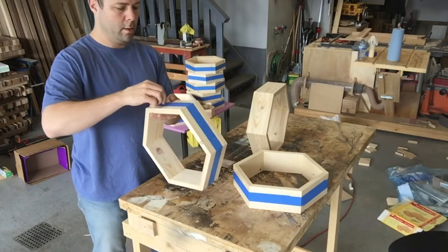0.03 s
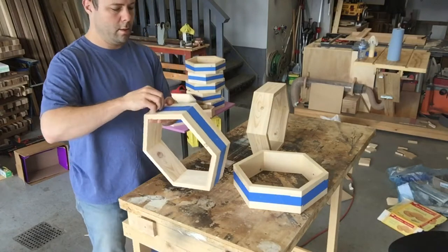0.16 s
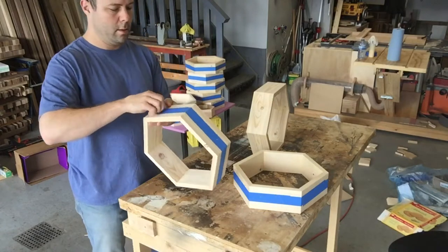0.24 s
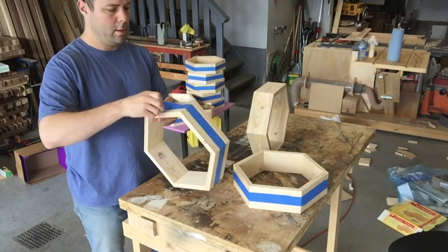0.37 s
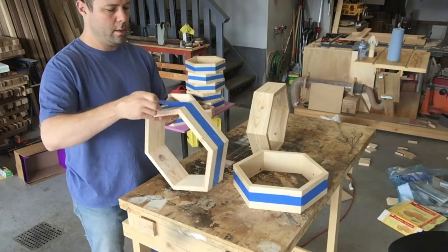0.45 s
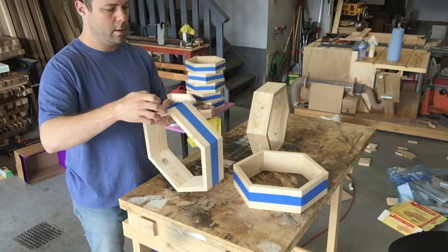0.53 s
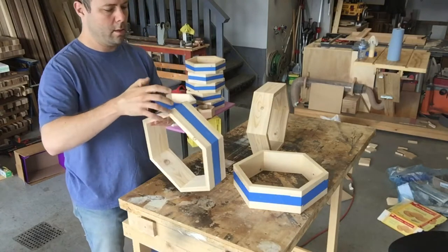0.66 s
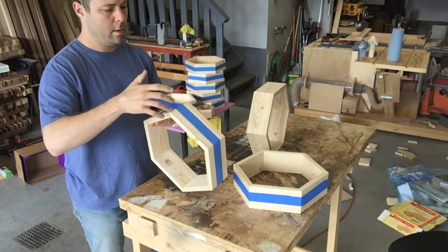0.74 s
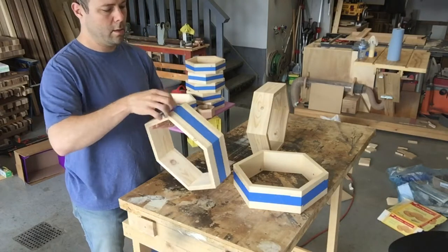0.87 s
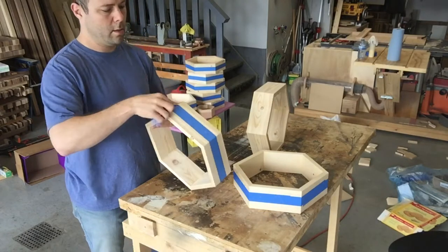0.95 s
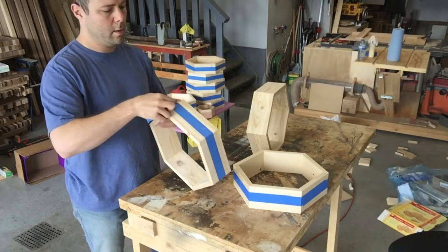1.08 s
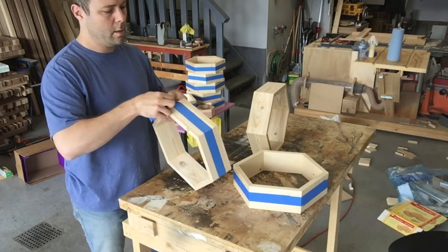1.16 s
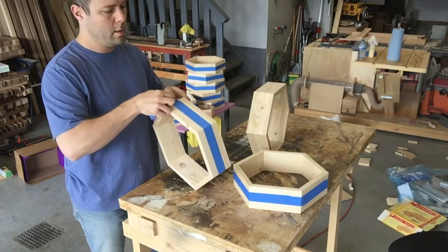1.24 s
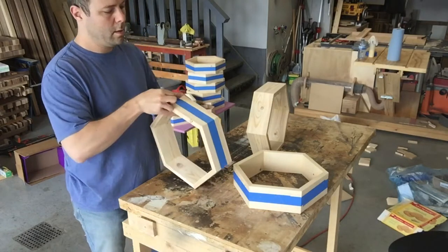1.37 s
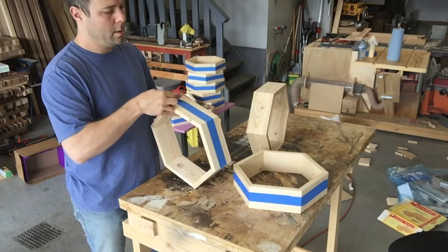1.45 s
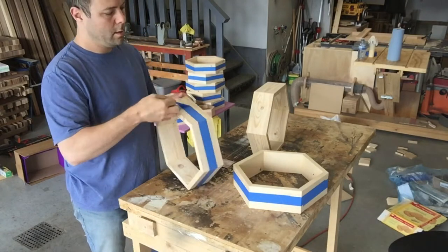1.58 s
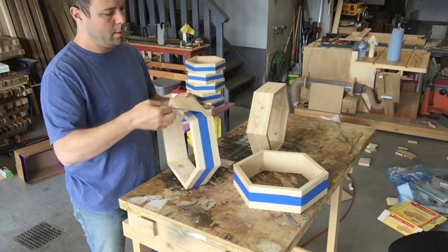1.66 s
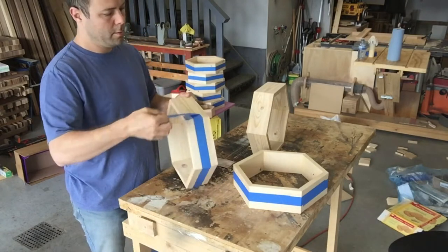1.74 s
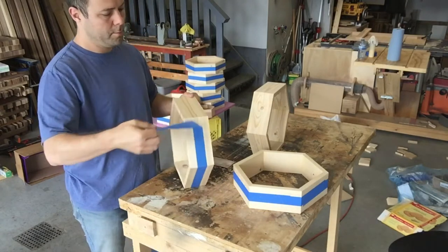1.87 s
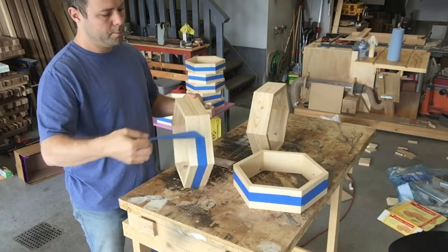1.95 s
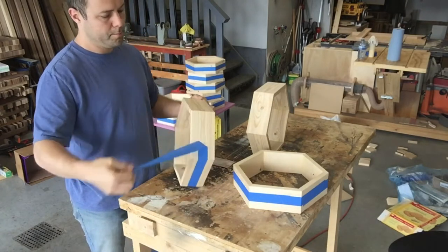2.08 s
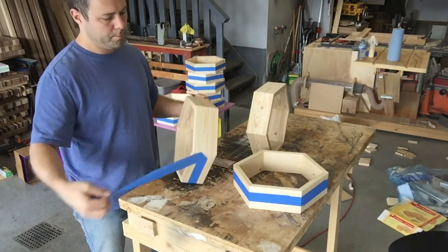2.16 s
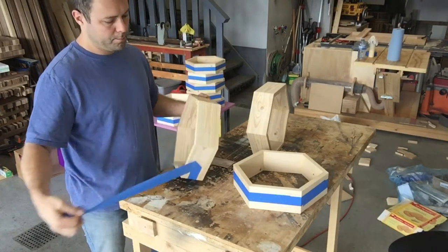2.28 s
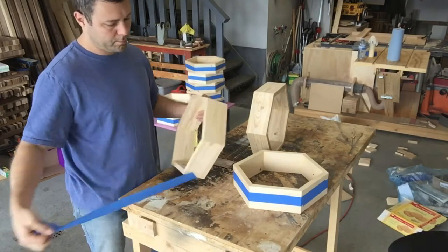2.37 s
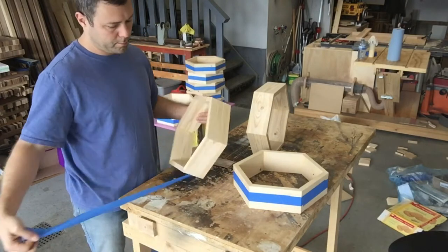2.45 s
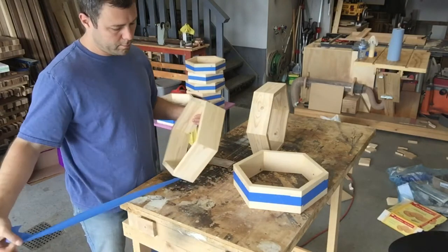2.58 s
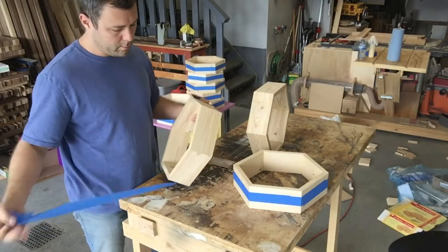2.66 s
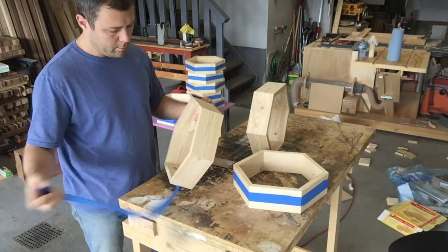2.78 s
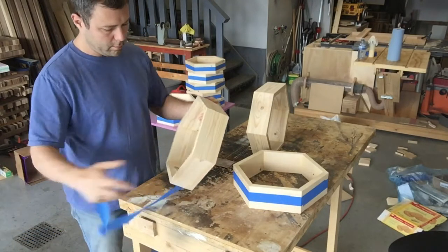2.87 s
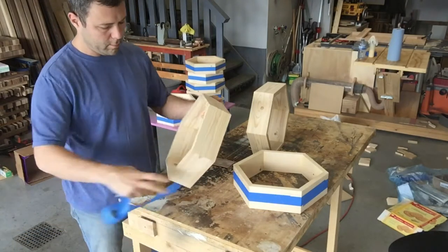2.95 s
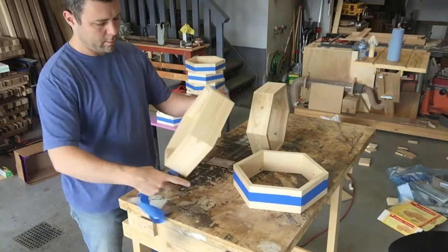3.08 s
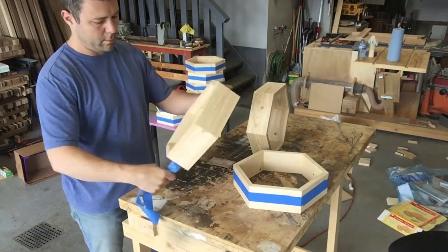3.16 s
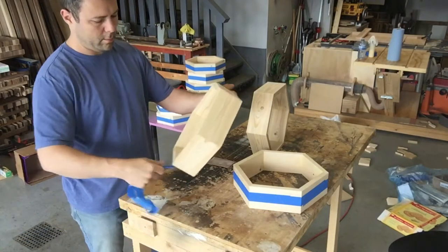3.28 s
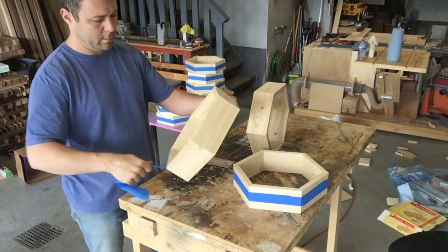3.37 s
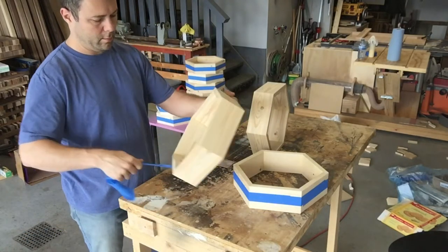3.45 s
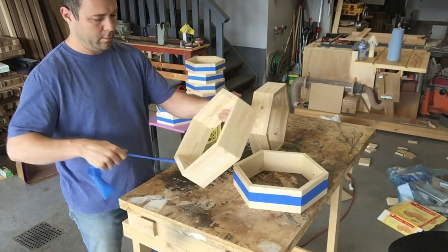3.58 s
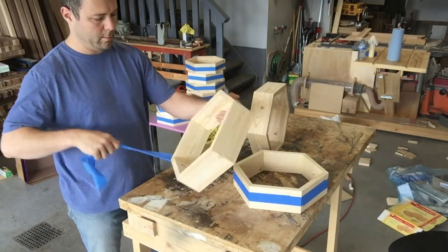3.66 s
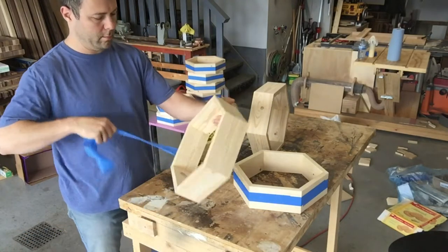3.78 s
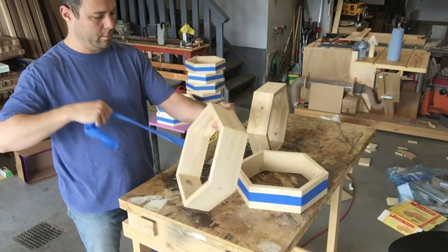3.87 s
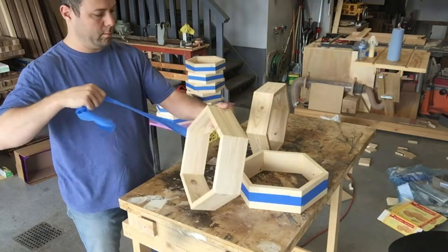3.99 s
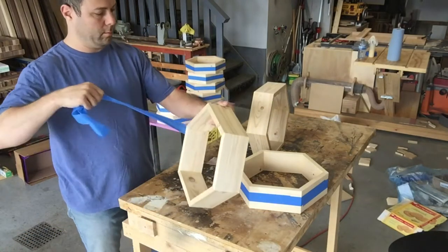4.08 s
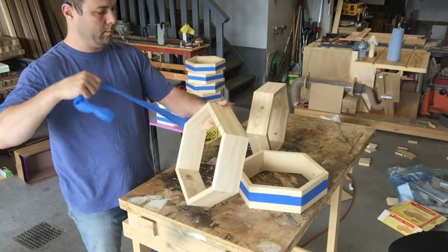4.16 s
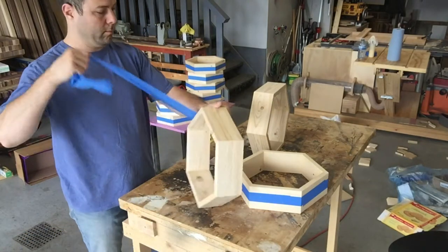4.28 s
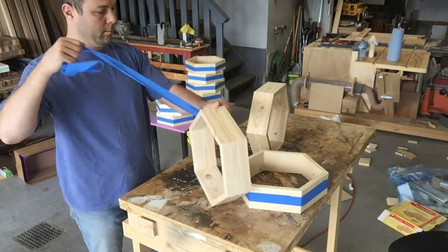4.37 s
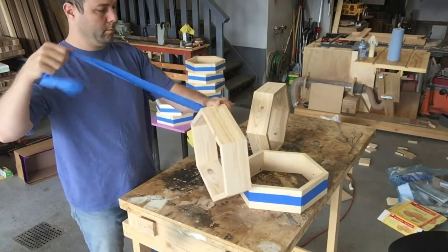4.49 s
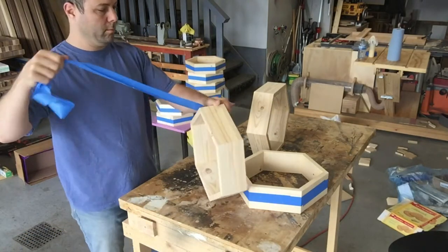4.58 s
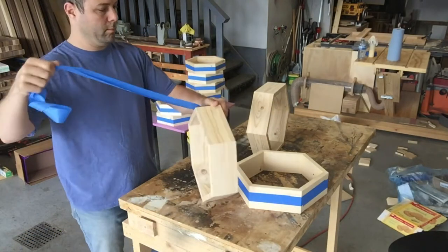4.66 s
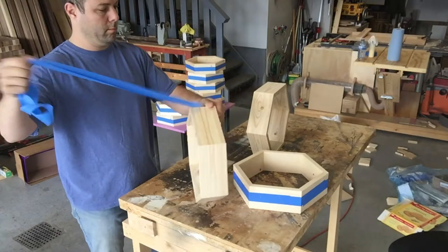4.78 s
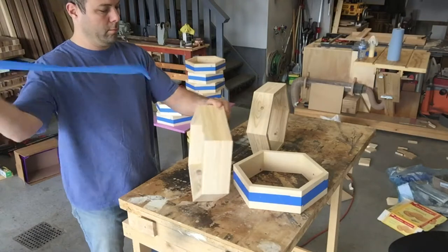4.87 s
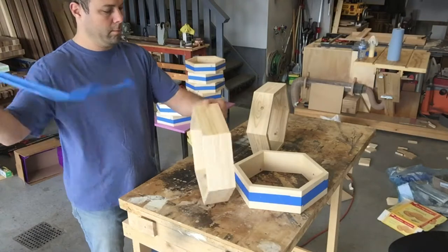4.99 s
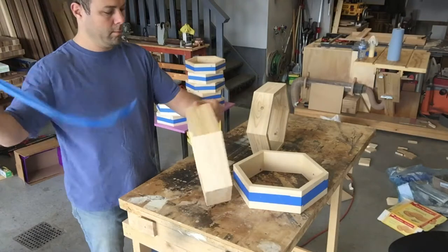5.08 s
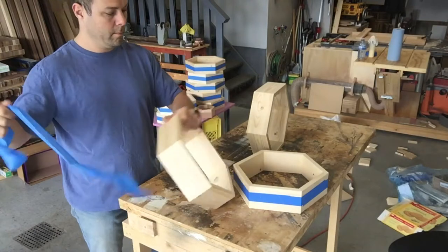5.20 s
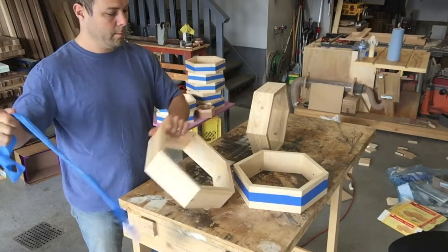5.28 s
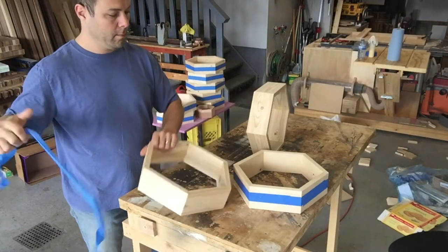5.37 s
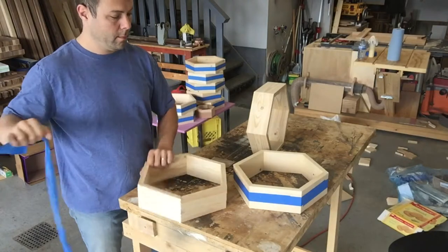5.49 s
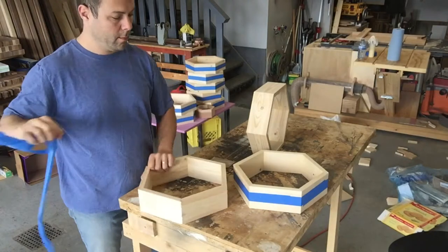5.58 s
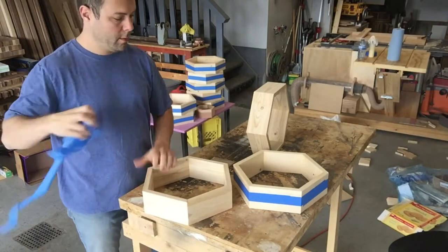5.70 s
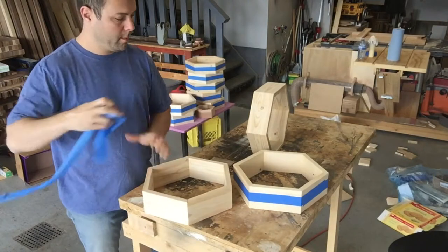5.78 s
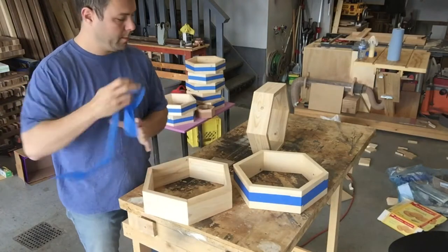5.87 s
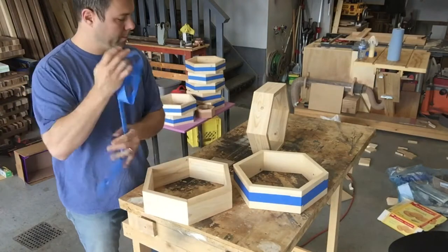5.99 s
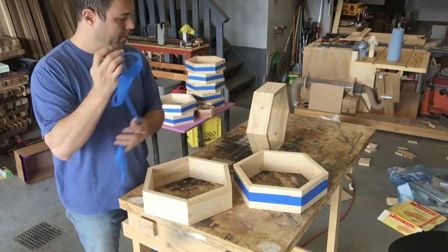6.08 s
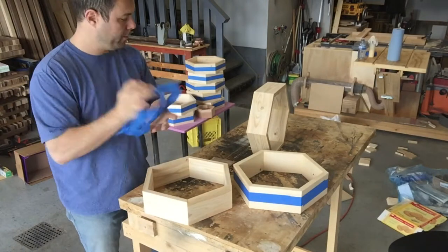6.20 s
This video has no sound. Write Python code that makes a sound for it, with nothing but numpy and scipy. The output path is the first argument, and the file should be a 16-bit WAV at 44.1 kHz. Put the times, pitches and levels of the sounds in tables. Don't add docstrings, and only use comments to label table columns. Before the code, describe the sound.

Paper tape rips from wood in uneven sticky rasps with crisp snaps, a hollow clunk onto a workbench, then loose tape crumpling in a concrete workshop.

```python
import sys
import numpy as np
from scipy import signal
from scipy.fft import rfft, irfft, next_fast_len
from scipy.io import wavfile
from scipy.ndimage import uniform_filter1d, map_coordinates

SR = 44100
rng = np.random.default_rng(int(sys.argv[2]) if len(sys.argv) > 2 else 0)


def natural_amplitude(level_db):
    exponent = np.asarray(level_db, float) / 20
    return 10 ** exponent


def wav_record(signal):
    frames = np.transpose(np.atleast_2d(signal))
    bounded = np.clip(frames, -1, 1)
    quanta = np.round(bounded * 32767).astype(np.int16)
    wavfile.write(sys.argv[1], SR, quanta)


N = 275184
T = np.arange(N) / SR
TOP_HZ = 15900


def unit(x):
    return x / np.sqrt(np.mean(x ** 2) + 1e-20)


def along(points, hz):
    f, v = np.transpose(points)
    return np.interp(np.log(hz + 1), np.log(f + 1), v)


def wobble(rate):
    knots = rng.standard_normal(int(N * rate / SR) + 4)
    return map_coordinates(knots, [T * rate])


def filtered(x, response):
    m = next_fast_len(len(x) + 8192)
    return irfft(rfft(x, m) * response(np.fft.rfftfreq(m, 1 / SR)), m)[:len(x)]


def coloured(x, points):
    return unit(filtered(x, lambda hz: natural_amplitude(along(points, hz))))


def resonant(x, peaks):
    def body(f):
        total = 0
        for k, (centre, width, db) in enumerate(peaks):
            damping = 1j * f * width
            total = total + (-1) ** k * natural_amplitude(db) * damping / (centre * centre - f * f + damping)
        return total
    return unit(filtered(x, body))


def band(x, lo_hz, hi_hz):
    return signal.sosfilt(signal.butter(2, [lo_hz, hi_hz], "band", fs=SR, output="sos"), x)


def strokes(rows):
    power, t = 0, T[::44]
    for s, rise, hold, fall, db in rows:
        before = (s - t) / max(rise, 1e-3)
        after = (t - s - abs(hold)) / max(fall, 1e-3)
        away = np.clip(np.maximum(before, after), 0, 8)
        power = power + natural_amplitude(db - 15 * away) ** 2
    return np.interp(T, t, np.sqrt(power))


def slips(spread_db, clump_db):
    size_db = spread_db * np.minimum(rng.exponential(size=N), 3.5)
    size_db = size_db + clump_db * (wobble(250) + wobble(60) / 2)
    z = signal.stft(rng.standard_normal(N) * natural_amplitude(size_db), nperseg=256)[2]
    patches = uniform_filter1d(rng.standard_normal(z.shape), size=3, axis=0)
    patches = uniform_filter1d(patches, size=5, axis=1)
    zones = uniform_filter1d(patches, size=7, axis=0)
    zones = uniform_filter1d(zones, size=30, axis=1)
    return signal.istft(z * natural_amplitude(2.3 * unit(patches) + 1.3 * unit(zones)), nperseg=256)[1][:N]


def ring(modes, t, attack, blur, favoured_hz=None):
    hz, db, t60 = np.transpose(modes)[..., None]
    luck = rng.standard_normal((len(modes), len(t) // 50))
    wander = np.cumsum(np.repeat(luck, 50, axis=1), axis=1)
    tones = np.sin(2 * np.pi * hz * t + blur * np.sqrt(hz) / SR * wander)
    if favoured_hz:
        db = db - 9 * np.log2(hz / favoured_hz) ** 2
    dying = natural_amplitude(db + 2 * luck[:, :1]) * np.exp(-np.log(1000) * t / t60)
    return np.sum(dying * tones, 0) * (1 - np.exp(-(t / attack) ** 2))


# (t/s, level/dB)
MOTOR = [(0.0, -71), (0.2, -73), (0.4, -58), (0.73, -71), (1.03, -55.5), (1.2, -71), (1.77, -66),
         (1.94, -52), (2.17, -60.5), (2.4, -58.5), (2.92, -65), (3.13, -72.5), (3.6, -91), (4.3, -85),
         (4.57, -55), (5.15, -76.5), (5.85, -64), (6.24, -72)]
# (f/Hz, width/Hz, level/dB)
HUMS = [(240, 4.6, -78), (993, 3.3, -84)]
# (f/Hz, level/dB per Hz)
AIR = [(15, -63), (25, -0.5), (40, -17.5), (63, -6), (170, -20), (190, -17), (236, -21.5), (270, -21.5),
       (405, -25), (988, -27), (1070, -24.5), (1290, -24.5), (1520, -25.5), (2280, -28), (16000, -43)]


def background():
    first_db = np.interp(T, *np.transpose(MOTOR))
    second_db = -73 + 0.69 * (first_db - first_db.mean())
    noise = rng.standard_normal((3, N))
    motor = natural_amplitude(first_db + 4.0 * wobble(6.9)) * resonant(noise[0], [(59.9, 2.5, 8), (70.6, 6.6, -23.0)])
    motor += natural_amplitude(second_db + 6.5 * wobble(9.4)) * resonant(noise[1], [(92.4, 3.8, 1.5), (115.7, 9.4, -0.5)])
    whines = 0
    for hz, width, db in HUMS:
        whines = whines + natural_amplitude(db) * resonant(rng.standard_normal(N), [(hz, width, 0)])
    return motor + whines + natural_amplitude(-68 + wobble(4.62) / 2) * coloured(noise[2], AIR)


# (full t/s, rise t/s, hold t/s, fall t/s, level/dB)
RUBS = [
    (0.209, 0.0099, 0.03, 0.019, -55),
]
# (f/Hz, width/Hz, level/dB)
RUBBED = [(1230, 14, 0), (1790, 35, -1.5), (2230, 13, 1), (3490, 60, -17.5), (4230, 60, -19),
          (4860, 55, -23), (6250, 60, -23), (7260, 60, -22)]
# (full t/s, rise t/s, hold t/s, fall t/s, level/dB)
SCRAPES = [(1.05, 0.0079, .002, 0.022, -55), (1.116, .01, 0.29, .05, -69.5), (1.12, .01, 0.013, 0.025, -67),
           (1.175, .015, .005, .015, -60), (1.21, 0.012, 0.0089, .01, -59),
           (1.355, 0.025, 0.01, 0.011, -66), (1.432, .012, 0.0019, 0.089, -63.5),
           (1.565, 0.12, 0.0064, 0.012, -59.5), (1.77, .02, 0.048, 0.032, -59.5),
           (5.27, 0.021, 0.019, 0.027, -55.5), (5.4, .01, 0.0024, 0.0087, -71)]
# (t/s, f/Hz)
SLIDE = [
    (1.05, 2030),
    (1.12, 1980),
    (1.4, 1875),
    (1.49, 1794),
    (1.51, 1450),
    (1.58, 900),
    (1.68, 1793),
    (1.9, 1780),
    (5.25, 2070),
    (5.4, 2300),
]
# (full t/s, rise t/s, hold t/s, fall t/s, level/dB)
ROCKING = [
    (1.715, 0.16, .015, 0.044, -36.5),
    (4.45, .03, 0.029, .02, -63),
    (4.507, 0.0033, 0.011, 0.047, -40),
    (4.61, .04, 0.018, .06, -46.5),
    (4.69, .03, .01, .02, -53.5),
    (4.74, 0.05, 0.012, 0.025, -30),
    (4.805, 0.018, 0.014, .03, -44),
    (4.89, 0.047, 0.0066, 0.021, -40),
]
# (f/Hz, width/Hz, level/dB)
ROCKED = [(410, 11, 11), (454, 54, -1), (574, 33, -34), (844, 58, 1)]


def rubs():
    chatter = slips(spread_db=2.5, clump_db=2.5)
    squeak = strokes(RUBS) * resonant(chatter, RUBBED)
    rock = strokes(ROCKING) * natural_amplitude(-24) * resonant(chatter, ROCKED)
    pitch_hz = np.interp(T, *np.transpose(SLIDE)) * (1 + 0.02 * wobble(9.9))
    waver = unit(1.1 + unit(band(rng.standard_normal(N), 48, 210)))
    scrape = strokes(SCRAPES) * waver * np.sin(2 * np.pi * np.cumsum(pitch_hz) / SR)
    return squeak + rock + scrape


# (f/Hz, t60/s)
GARAGE = [(100, 0.64), (500, 0.46), (2000, 0.45), (6000, 0.37), (14000, 0.26)]


def garage(x):
    hz, t, z = signal.stft(rng.standard_normal(SR // 2 + SR // 4), SR, nperseg=256)
    tail = signal.istft(z * natural_amplitude(-60 * t / along(GARAGE, hz)[:, None]), SR, nperseg=256)[1]
    return signal.fftconvolve(np.pad(x, (150, 0)), tail / np.linalg.norm(tail))[:N]


# (t/s, peak level/dB, paper pitch
# f/Hz, crispness level/dB)
SNAPS = [(0.3426, -39, 7990, -3), (0.404, -34, 4000, 2), (0.4124, -36, 3510, 0), (0.4838, -16, 1500, 2),
         (0.4912, -14, 2900, 3), (0.7597, -55, 3570, -4), (0.9188, -54, 1900, -8), (1.0061, -42, 2900, 0),
         (1.0425, -40, 2200, -2), (1.0594, -40, 1890, -6), (2.2687, -26, 2810, -4),
         (2.7726, -45, 2300, -10), (2.799, -37, 4540, -3), (2.8944, -26, 4000, -4), (2.9003, -15, 2400, -2),
         (2.9074, -26, 2470, -7), (3.1944, -50, 4500, -4), (3.2031, -48, 2600, -10),
         (3.2705, -31, 2600, -4), (3.3278, -23, 2200, -8), (3.3405, -22, 1300, -4), (4.7067, -33, 3000, -1),
         (4.8778, -24, 5200, -6),
         (5.2535, -41, 2600, -4), (5.3597, -47, 7430, -16), (5.4011, -38, 3800, 2), (5.4161, -25, 3400, -6),
         (5.4949, -39, 2700, -4), (5.5253, -47, 2170, -6), (5.7654, -28, 3400, 0), (5.8805, -36, 3000, -2),
         (6.0117, -36, 2910, 2), (6.0482, -32, 2940, 0), (6.1045, -34, 3200, -2), (6.2277, -40, 4900, -3)]
# (t/s, peak level/dB, paper pitch f/Hz, crispness level/dB)
CRACKLES = [(1.014, -46, 3270, -14), (1.03, -51, 3470, -8), (1.048, -50.5, 3100, -8),
            (1.062, -46, 1990, -6), (1.122, -48, 5000, -6), (1.236, -53, 1270, -12), (1.6794, -57, 2820, 8),
            (1.722, -32.5, 6300, 0), (1.9613, -32.5, 6330, -4), (2.3, -45, 6400, -2),
            (2.498, -26.5, 5750, -2), (3.1442, -56, 2870, -4), (3.1612, -51, 2880, 10),
            (3.2031, -45, 2940, -11), (3.2774, -36, 2740, -5), (3.312, -47, 900, -6), (3.47, -44, 6780, -4),
            (4.1968, -55, 3220, -3), (4.2517, -59, 2600, -5), (4.2762, -39, 6700, -4),
            (4.2976, -44, 2480, -4), (4.8553, -39, 6700, -6), (4.8633, -38.5, 2230, 4),
            (4.8915, -46, 6560, -2), (5.264, -50, 8700, -8), (5.3849, -41.5, 8000, -8),
            (5.435, -36, 10500, -11), (5.575, -52, 12500, -6), (5.6269, -52, 8500, -1),
            (5.634, -46, 13000, -6), (5.722, -42, 12500, -4), (5.745, -34, 3360, -1),
            (5.772, -33.5, 8650, -3), (5.797, -43, 8040, -2), (5.9741, -56, 2880, 0),
            (5.9846, -49, 3870, 3), (6.019, -50, 3420, 1), (6.082, -49, 9000, -6),
            (6.1093, -33, 3700, -10.5), (6.132, -35.5, 3100, -6), (6.147, -41, 3320, -9.5),
            (6.1815, -51, 8050, -2), (3.335, -29, 2950, 6), (3.3375, -28, 3370, -11),
            (3.367, -41, 2100, -6), (3.262, -43, 1860, -6), (2.1813, -44, 1350, 0), (4.322, -33, 2400, -3),
            (4.331, -37, 2450, -6), (4.32, -31, 3530, -5), (4.352, -30, 2050, -6)]


def snaps(rows, ring_db):
    out, t = np.zeros(N + SR), np.arange(2500) / SR
    for s, db, paper_hz, crisp_db in rows:
        decay = 0.14 * natural_amplitude(-60 * t / 0.014) + 0.09 * natural_amplitude(-60 * t / 0.045)
        burst = rng.standard_normal(len(t)) * decay
        burst[0] = 2.5
        snap = band(burst, paper_hz * 0.72, min(paper_hz * 2.13, TOP_HZ))
        snap += natural_amplitude(-7 + crisp_db) * band(burst, 2100, 9800)
        if paper_hz < 6000:
            snap += natural_amplitude(-10 - 8 * np.log2(paper_hz / 2000)) * band(burst, 1560, 4000)
        snap += natural_amplitude(ring_db) * band(burst, paper_hz * 0.935, paper_hz * 1.137)
        out[round(s * SR):][:len(t)] += natural_amplitude(db) * snap / np.abs(snap).max()
    bounce_s, bounce_gain = 0.000196, 0.19
    return filtered(out[:N], lambda hz: 0.89 * (1 - bounce_gain * np.exp(-2j * np.pi * hz * bounce_s)))


# (full t/s, rise t/s, hold t/s, fall t/s, level/dB). Fingers pick at a tape end
LIFTS = [(0.406, 0.0024, 0.097, 0.037, -48), (0.48, 0.034, 0.052, 0.018, -42),
         (0.55, .01, 0.001, 0.088, -54.5), (1.006, 0.0026, 0.021, 0.082, -59),
         (1.03, 0.017, 0.001, 0.22, -67), (1.3, 0.12, .13, .1, -93), (1.618, 0.26, 0.0049, 0.02, -60.5),
         (2.797, 0.023, .005, .02, -69), (2.862, 0.061, 0.01, 0.011, -48),
         (2.91, 0.028, .002, 0.059, -45.5), (3.195, 0.01, 0.0087, 0.16, -64),
         (3.271, 0.003, 0.015, 0.022, -47.5)]
PULLS = [(1.725, 0.06, 0.026, 0.074, -48.5), (1.66, .12, .03, .03, -59.5),
         (1.963, 0.043, 0.0092, 0.025, -45.5), (1.99, 0.15, 0.12, 0.04, -52.5),
         (2.2, 0.032, 0.062, 0.069, -51), (2.268, 0.096, 0.24, 0.022, -44.5),
         (3.336, 0.016, 0.0059, 0.019, -39.5), (3.36, .01, .002, 0.08, -49.5),
         (3.512, 0.045, 0.057, 0.13, -47.5), (3.6, .03, 0.031, 0.023, -55.5),
         (4.328, 0.045, 0.0014, 0.045, -37.5), (4.6, 0.11, 0.13, 0.036, -66),
         (4.745, .02, 0.0088, 0.02, -66)]
HAULS = [
    (3.814, 0.0044, 0.02, 0.037, -56),
    (3.86, 0.046, 0.17, 0.04, -50),
    (4.05, 0.03, 0.03, 0.013, -60),
    (4.38, 0.057, 0.064, 0.068, -57),
    (4.53, 0.045, 0.0023, 0.038, -50),
    (4.8, 0.035, 0.11, 0.035, -66.5),
    (5.59, 0.093, 0.09, 0.064, -60.5),
]
FLICKS = [
    (0.394, 0.027, 0.0064, 0.012, -72),
    (2.495, 0.024, 0.0083, 0.014, -61),
    (2.71, 0.079, 0.0089, 0.024, -74),
    (4.876, 0.025, 0.0029, 0.017, -53),
    (4.89, .02, 0.012, 0.0094, -60),
]
CRUMPLES = [
    (5.253, 0.0024, 0.0083, 0.019, -63),
    (5.3, 0.035, 0.02, 0.14, -70),
    (5.402, 0.013, 0.01, 0.075, -49),
    (5.715, 0.021, 0.099, 0.09, -52.5),
    (5.88, 0.11, 0.012, 0.023, -57.5),
    (5.98, 0.0089, 0.038, .02, -59.5),
    (6.013, 0.0051, 0.044, 0.066, -51.5),
    (6.08, 0.022, 0.026, .02, -63),
    (6.105, 0.0036, 0.0023, 0.11, -51.5),
    (6.235, 0.015, 0.014, 0.069, -53),
]
# (strokes, pitch ratio of the free paper, sizzle level/dB, frame drone level/dB, grit 0-1)
HANDLING = [
    (LIFTS, 0.98, 0.33, -6.5, 0.13),
    (PULLS, 1, 0.33, 0, 0.017),
    (HAULS, 0.99, -0.17, 5, 0.019),
    (FLICKS, 1, 8.1, -1.2, 0.1),
    (CRUMPLES, 1.16, -2, -2, 0.35),
]
# (f/Hz, level/dB per Hz)
TAPE = [(760, -50), (1300, 1), (1880, 5), (2070, 3.5), (2240, 5.5), (2880, 2.5), (4830, -2.5), (6500, -4.5),
        (8450, -74), (14300, -120)]
# (f/Hz, level/dB per Hz)
SIZZLE = [(2650, -18), (4500, -19), (4820, -24.5), (6520, -2.5), (8370, -8), (9610, -8.5), (10200, -12.5),
          (15600, -15), (16400, -53)]
# (f/Hz, width/Hz, level/dB)
DRONE = [(306, 68, -6), (392, 40, 0), (515, 94, -2), (900, 110, 2.5), (1080, 128, 0.5), (1450, 127, 4.5)]


def peel():
    even, out = slips(spread_db=4.5, clump_db=1), 0
    clumps = np.abs(uniform_filter1d(unit(even) ** 2, size=90)) + 1e-3
    drone = resonant(even, DRONE)
    for rows, ratio, sizzle_db, drone_db, grit in HANDLING:
        glue = even * clumps ** grit
        sizzle = coloured(glue, SIZZLE)
        rasp = coloured(glue, np.multiply(TAPE, [ratio, 1]))
        pull = uniform_filter1d(strokes(rows), size=120)
        out = out + pull * (rasp + natural_amplitude(sizzle_db - 4) * sizzle + natural_amplitude(drone_db - 5.5) * drone)
    return out


# (t/s, level/dB, pitch of that board f/Hz, ring length ratio)
NUDGES = [(1.118, -64, 425, 0.37), (1.433, -57, 430, 0.5), (1.435, -59, 860, .25), (1.456, -64, 430, .35),
          (2.182, -49, 520, .3), (2.9, -51.5, 420, 0.37), (3.329, -31.5, 1115, 0.24),
          (3.337, -31, 1090, 0.32), (4.274, -57, 320, 0.44), (4.295, -46, 523, 0.44),
          (4.506, -38, 504, 0.57), (4.506, -40.5, 900, 0.7), (4.55, -48, 442, 0.44),
          (4.595, -52, 407, 0.87), (4.599, -52, 830, 0.6), (4.665, -54, 385, .35), (4.707, -56, 790, 0.65),
          (4.73, -57, 774, .35), (4.735, -57, 483, .4), (4.795, -56.5, 375, 0.54), (4.805, -59, 820, 0.45),
          (4.856, -45.5, 993, 0.43), (4.877, -41.5, 1200, 0.14), (4.885, -55, 402, 0.3),
          (5.308, -50, 2200, 0.47), (5.308, -48, 377, 0.43), (5.309, -72, 960, .5), (5.322, -50, 320, 0.3),
          (5.44, -64, 334, 0.42), (5.493, -60.5, 795, 0.21), (5.568, -30, 337, 1), (5.569, -32, 1100, 0.54),
          (5.57, -52, 2200, 0.36), (5.599, -41, 334, .9), (5.664, -26, 430, 0.99), (5.666, -23, 1320, .5),
          (5.666, -36.5, 2200, 0.5), (5.69, -23, 485, 0.41), (5.71, -42, 2200, .5), (5.76, -33, 526, 0.71),
          (5.5685, -27, 705, 0.49), (5.574, -27.5, 560, .7), (5.58, -41, 820, 0.97),
          (5.57, -44, 1830, 0.76), (5.667, -16, 1790, .5), (5.68, -25, 1790, 0.2), (4.4, -42, 560, 0.73),
          (4.43, -46, 440, .8), (4.445, -50, 850, 0.43), (5.671, -20, 1110, .4), (5.697, -27, 1810, 0.35),
          (5.713, -39, 1810, 0.34)]
# (f/Hz, t60/s)
BOARDS = [(334, 0.43), (385, 0.094), (436, 0.21), (522, 0.12), (576, 0.14), (690, 0.044), (800, 0.31),
          (877, 0.12), (985, 0.091), (1120, 0.087), (1222, 0.11), (1389, 0.17), (1620, 0.034),
          (1780, 0.077), (1850, 0.084), (2110, 0.08), (2240, 0.16), (2406, 0.12)]


def nudges():
    out, t = np.zeros(N + SR), np.arange(8000) / SR
    hz, t60 = np.transpose(BOARDS)
    fade = np.cos(np.pi / 2 * t / t[-1])
    for s, db, board_hz, length in NUDGES:
        mode_db = -90 * np.log2(hz / board_hz) ** 2
        modes = np.transpose([hz, mode_db, t60 * max(length, 0.05)])
        touch = ring(modes[mode_db > -35], t, attack=0.001, blur=7)
        out[round(s * SR) - 20:][:len(t)] += natural_amplitude(db) * touch * fade
    return out[:N]


# (t/s, frame level/dB, bench level/dB, panel level/dB, click level/dB)
TAPS = [(1.12, -64, 10, -16, -22), (1.434, -61.5, 11.5, -20.5, -23), (1.46, -63, 13.5, -15, -2),
        (1.563, -72.5, -11, 14, -11), (1.838, -32, -11, -39, -33), (2.182, -29.5, -2.5, -37, -23),
        (2.206, -33, -21, -32, -30), (2.617, -61.5, 5, -30, -30), (4.505, -36.5, -19, -30, -23),
        (4.565, -51, 3.5, -39, -33), (4.739, -54, -15, -22, 2)]
# (t/s, frame level/dB, bench level/dB, panel level/dB, click level/dB)
KNOCKS = [(1.14, -67, -20, -8, -18), (1.717, -42, -13, -34, -27), (4.288, -49, -25, -11, -18),
          (4.361, -22.5, -13, -16.5, -20.5), (4.378, -25, -13, -25, -19), (5.308, -44, -2, -14, -7.5),
          (5.428, -48.5, -4.5, -30, -13), (5.569, -20, -21, -13.5, -25), (5.6616, -17.5, -26, -2.5, 2.5),
          (5.665, -20.5, -17.5, -7, 6), (5.691, -26.5, -12.5, -1, -32.5)]
# (f/Hz, level/dB, t60/s)
FRAME = [(209.6, -1, 0.25), (229.3, 1, 0.15), (278.8, -2, 0.17), (332.8, -11, 0.24), (392.3, 1.5, 0.13),
         (436, 0, 0.14), (488.5, -1, 0.1), (547, -12, 0.25), (640, -23, 0.035)]
# (f/Hz, level/dB, t60/s)
BENCH = [(63, -13, 0.41), (88.4, 6, 0.26), (123, 10.5, 0.13), (157.6, -7.5, 0.46)]
# (f/Hz, level/dB, t60/s)
PANEL = [(815, 20.5, 0.013), (892, 5, 0.26), (1021, 10, 0.073), (1199, 17, 0.041), (1220, -21, 0.31),
         (1350, -1.5, 0.34)]
# (f/Hz, level/dB, t60/s)
CLICK = [(1556, -5, .07), (1647, -7, .06), (1778, 2, .13), (1843, -2, .09), (1920, -8, .05),
         (2050, -7, .08), (2240, -7, .08), (2600, -8, .025), (3100, -9, .02)]


def knocks():
    out, t = np.zeros(N + SR), np.arange(13000) / SR
    for rows, base_hz, db_per_octave in ((TAPS, 324, 85), (KNOCKS, 193, 20)):
        for s, db, bench_db, panel_db, click_db in rows:
            favoured_hz = base_hz * 2 ** (-bench_db / db_per_octave)
            hit = natural_amplitude(-7.5) * ring(FRAME, t, attack=0.0023, blur=14, favoured_hz=favoured_hz)
            hit += natural_amplitude(bench_db + 0.5) * ring(BENCH, t, attack=0.016, blur=7)
            hit += natural_amplitude(panel_db - 9) * ring(PANEL, t, attack=0.0015, blur=18)
            hit += natural_amplitude(click_db - 4) * ring(CLICK, t, attack=0.00016, blur=14)
            crack = band(rng.standard_normal(len(t)), 2000, 6300)
            hit += natural_amplitude(click_db - 10.5 - 60 * t / 0.025) * crack
            out[round(s * SR) - 40:][:len(t)] += natural_amplitude(db) * hit
    return out[:N]


# (full t/s, rise t/s, hold t/s, fall t/s, level/dB)
TWANGS = [
    (3.862, .015, .135, .01, -56),
    (3.885, .01, .012, .015, -57),
    (4.008, .01, .075, .02, -53),
    (3.52, .02, .11, .03, -63),
]
# (f/Hz, width/Hz, level/dB)
TAUT = [(310, 50, 0), (571, 45, -1), (969, 110, -3)]


def twang():
    shaken = resonant(rng.standard_normal(N), TAUT)
    return strokes(TWANGS) * resonant(shaken, TAUT)


def scene():
    room = background()
    tape = rubs() + peel()
    ticks = snaps(SNAPS, ring_db=-11)
    wood = knocks()
    small = nudges() + snaps(CRACKLES, ring_db=16.5) + twang()
    echo = garage(natural_amplitude(-9.5) * tape + natural_amplitude(-10.5) * ticks + natural_amplitude(-7.5) * wood)
    echo = echo + garage(natural_amplitude(-9) * small)
    return (room + tape + ticks + wood + small + echo)[None]


def roll_off(x):
    return signal.sosfilt(signal.butter(12, 16510, fs=SR, output="sos"), x)


def record(dry):
    def microphone(hz):
        no_bass = 1 / np.sqrt(1 + (45 / (hz + 1)) ** 6)
        return (hz < TOP_HZ) * no_bass + natural_amplitude(-19) * (hz >= TOP_HZ)
    heard = filtered(dry[0], microphone)[None]
    return roll_off(heard)


dry = scene()
out = record(dry)
wav_record(out)
```